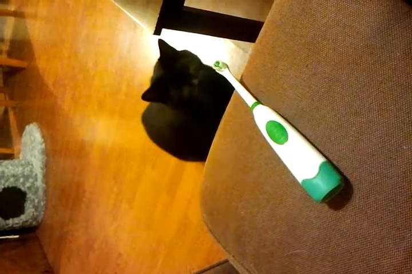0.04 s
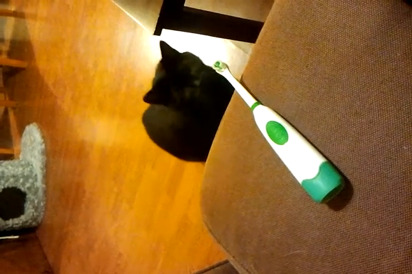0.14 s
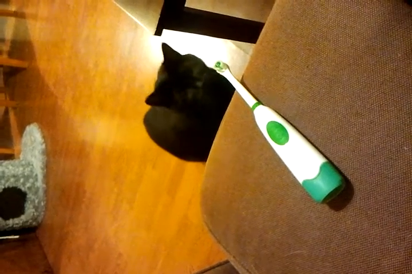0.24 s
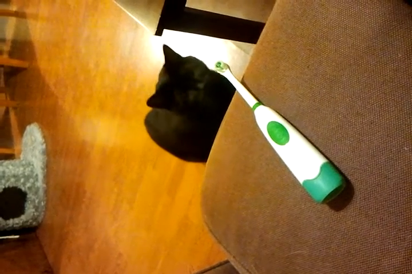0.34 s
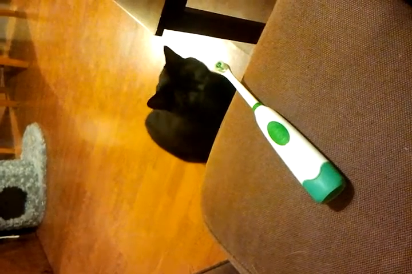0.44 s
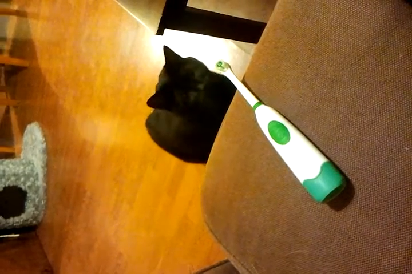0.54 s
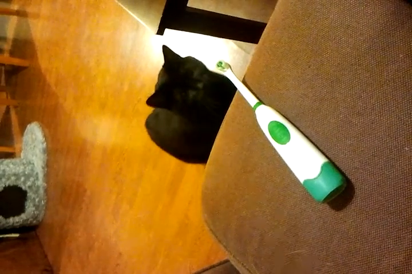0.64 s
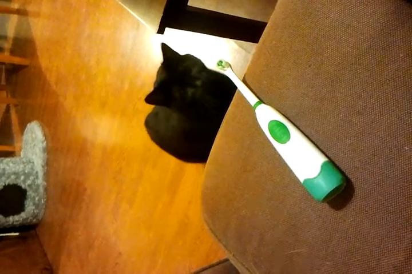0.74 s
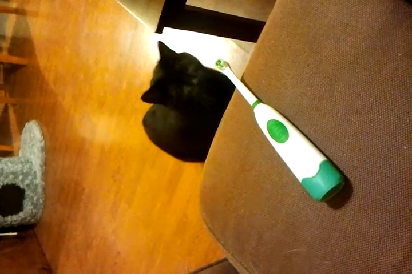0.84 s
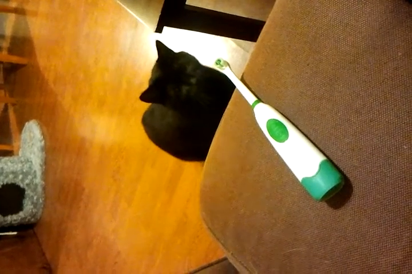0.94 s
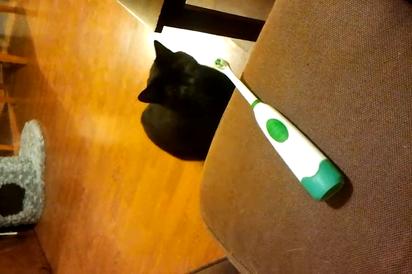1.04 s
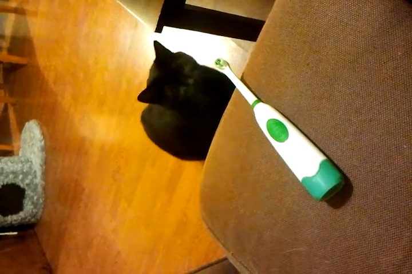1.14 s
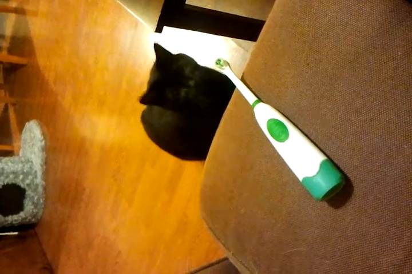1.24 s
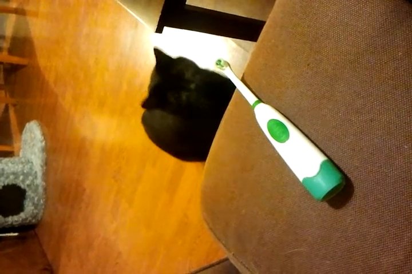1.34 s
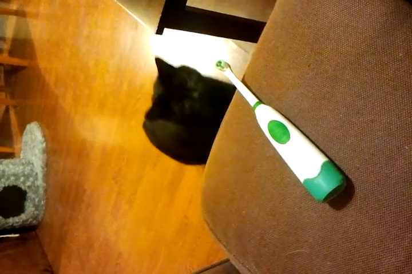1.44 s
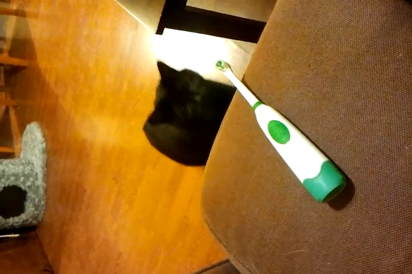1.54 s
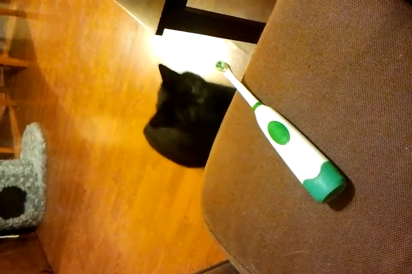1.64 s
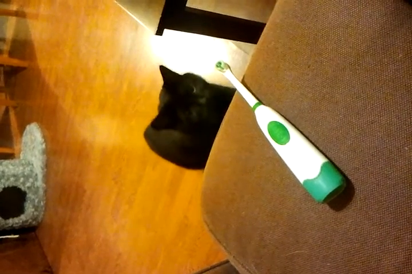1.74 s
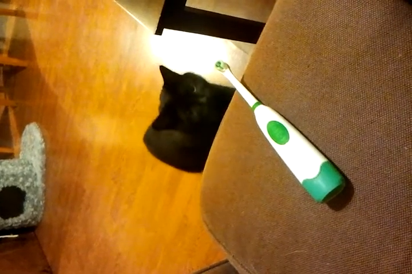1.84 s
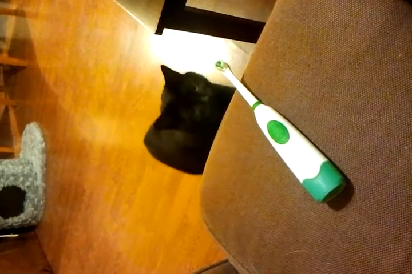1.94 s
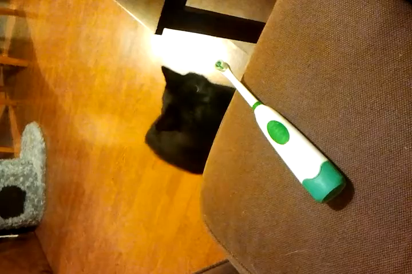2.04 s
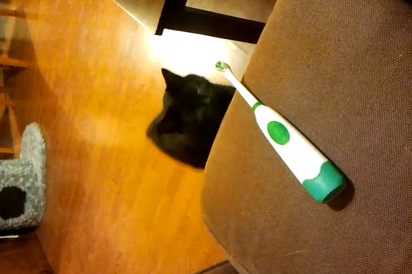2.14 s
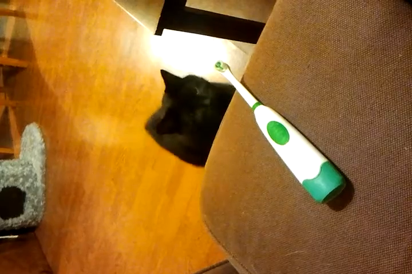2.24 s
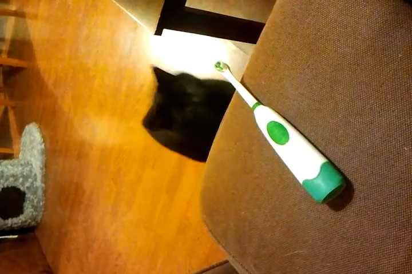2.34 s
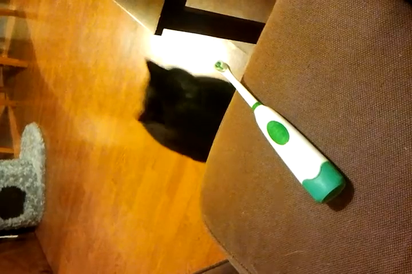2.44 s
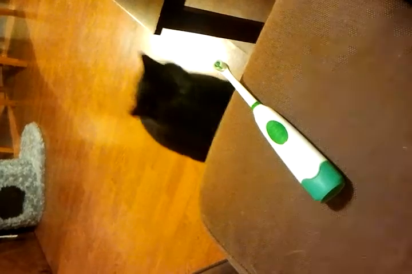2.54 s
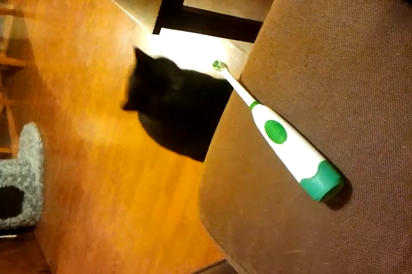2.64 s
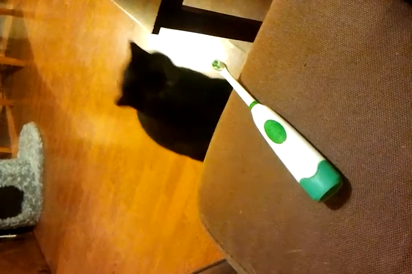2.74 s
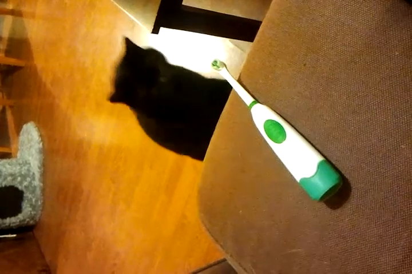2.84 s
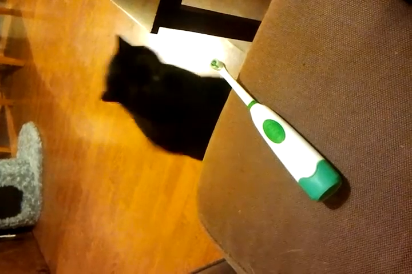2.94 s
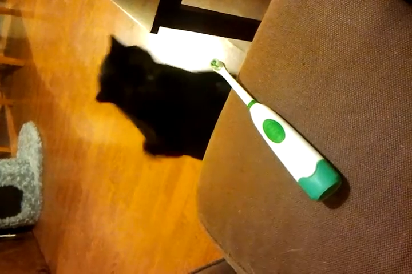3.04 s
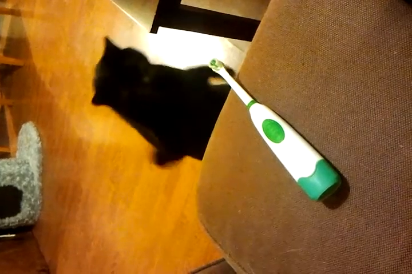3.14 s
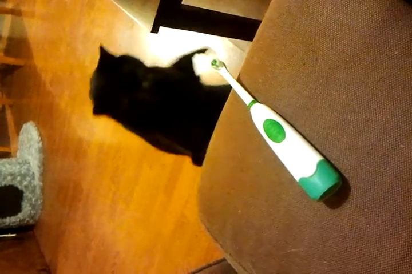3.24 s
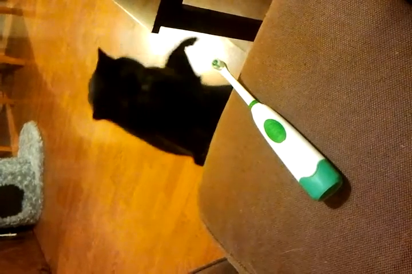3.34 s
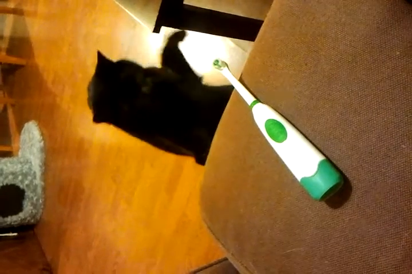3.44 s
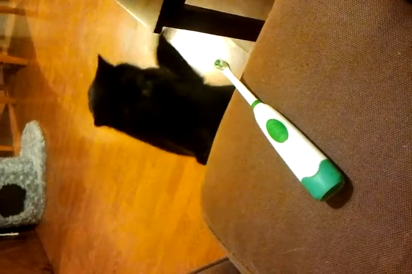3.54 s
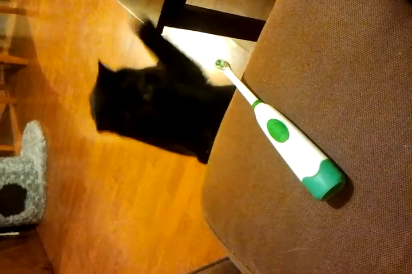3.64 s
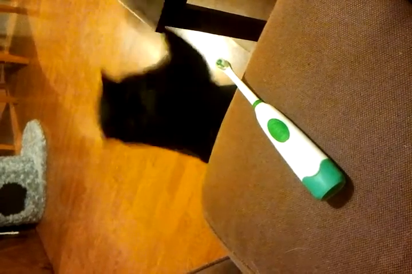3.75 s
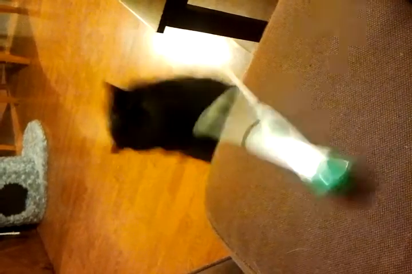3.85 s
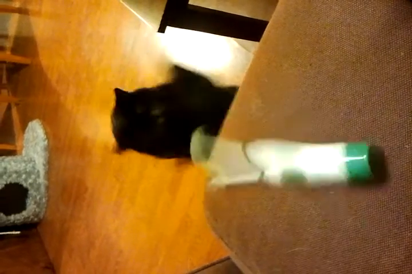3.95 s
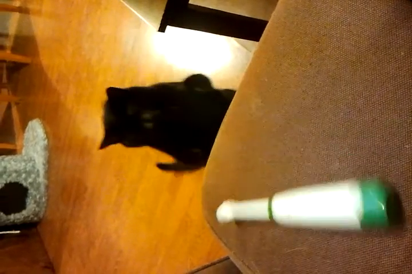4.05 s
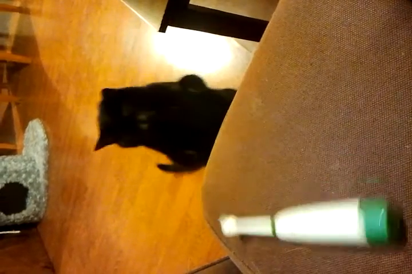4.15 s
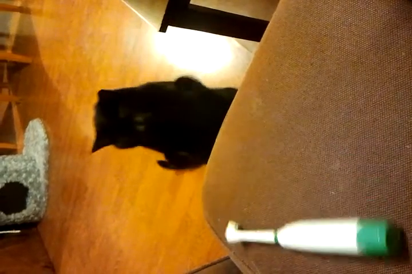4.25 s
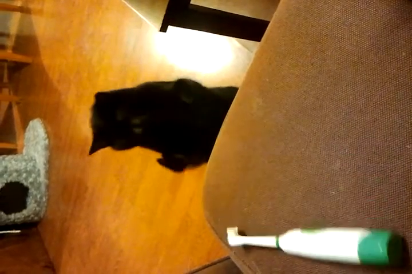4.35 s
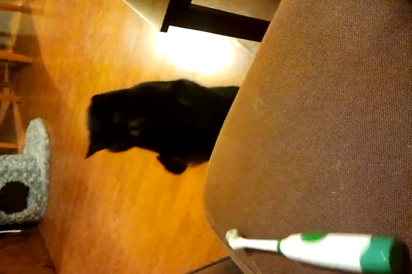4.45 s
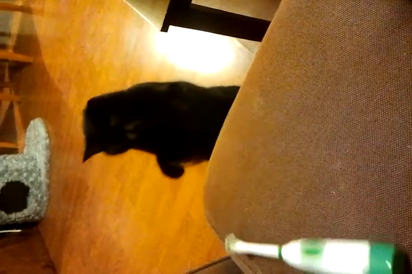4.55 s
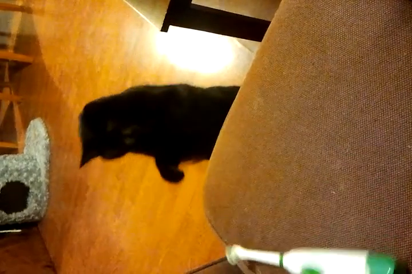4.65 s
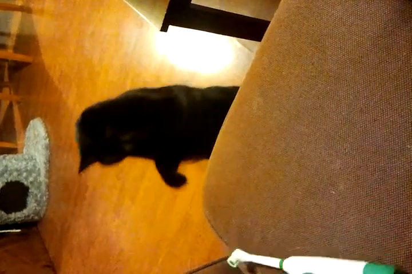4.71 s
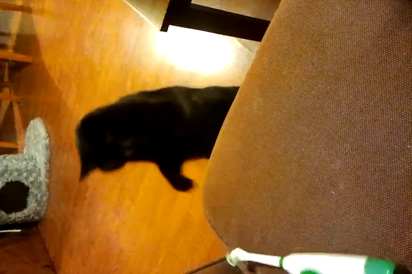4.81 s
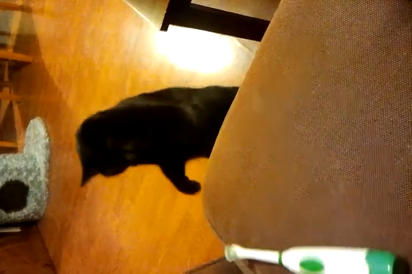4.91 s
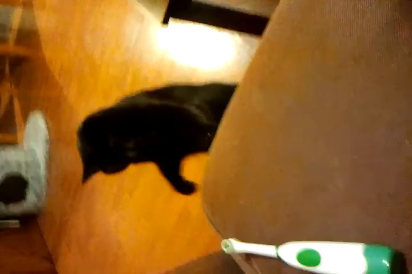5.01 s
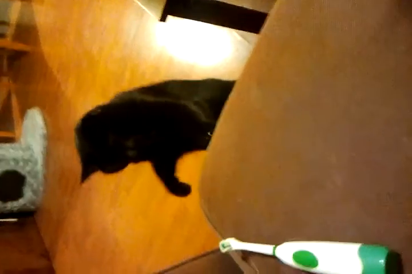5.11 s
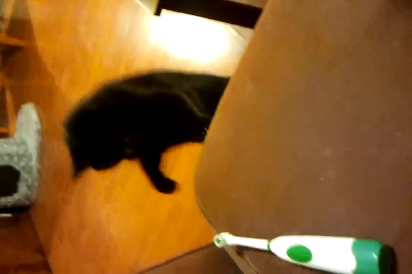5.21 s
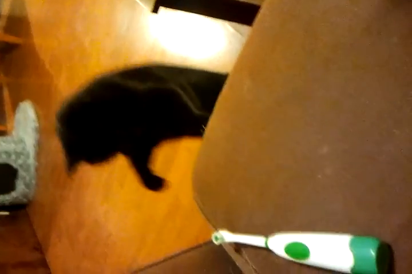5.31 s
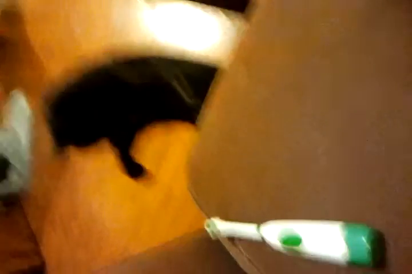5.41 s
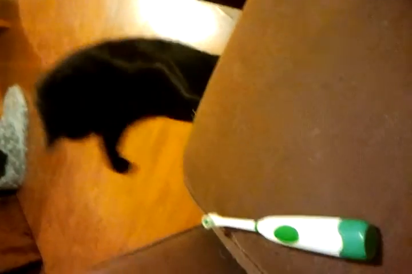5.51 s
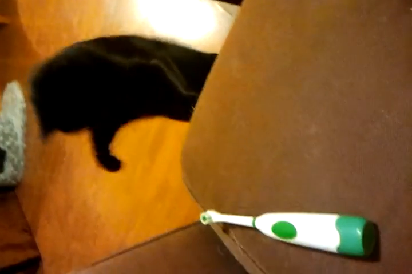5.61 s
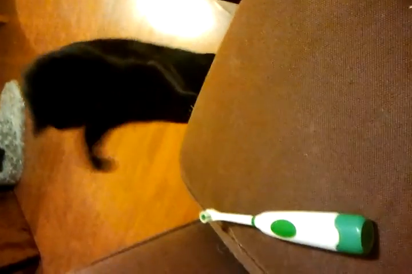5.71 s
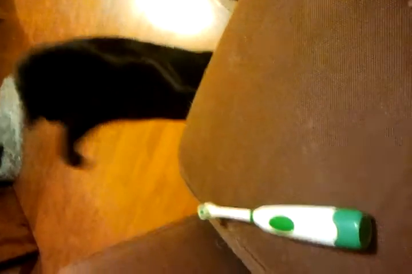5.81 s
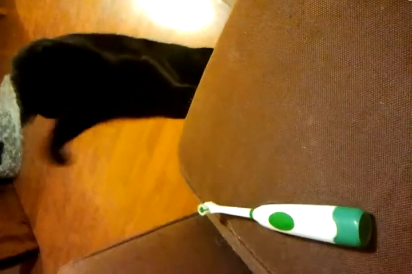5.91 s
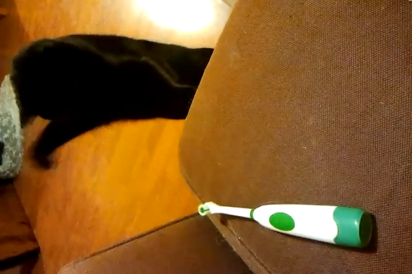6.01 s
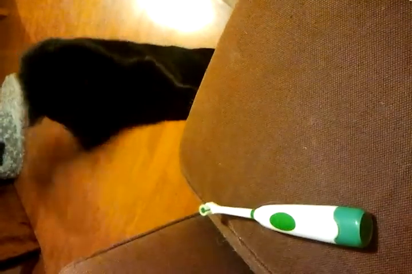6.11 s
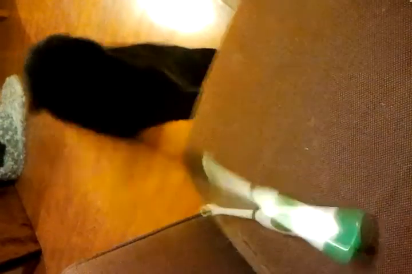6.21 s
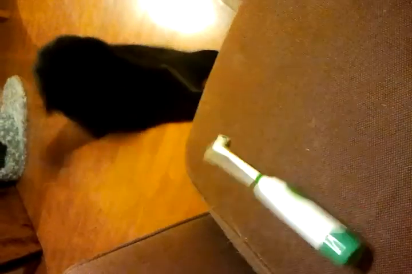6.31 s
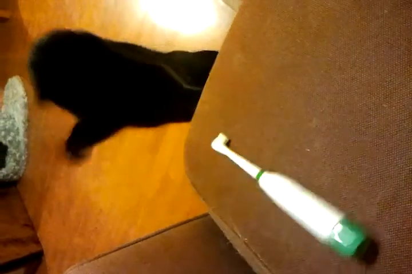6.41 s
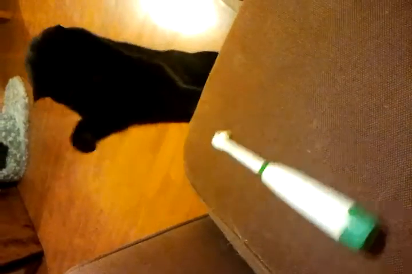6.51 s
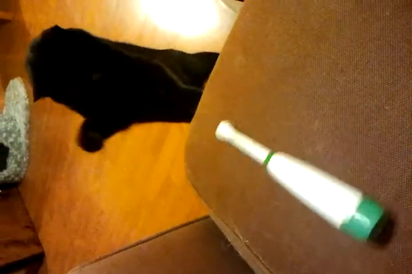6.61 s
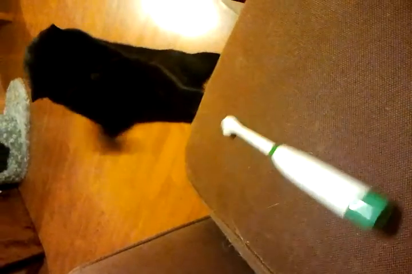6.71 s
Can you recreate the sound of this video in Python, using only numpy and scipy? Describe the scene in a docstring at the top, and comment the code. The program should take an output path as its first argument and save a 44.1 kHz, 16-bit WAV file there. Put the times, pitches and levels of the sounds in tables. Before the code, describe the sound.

A battery toothbrush lying on a padded fabric seat buzzes with a low, rough, nearly steady drone and plasticky ringing. Faint bumps come early, then a cat's paw hits it with sharp ticks and thuds. It rolls and rattles unevenly, settles into a brighter steady buzz, and is knocked loose again near the end. Close handheld microphone in a quiet small room, treble cut off.

```python
"""A battery toothbrush buzzes on a fabric seat; a cat paws it, it rolls, rattles loosely and settles.
A second paw blow near the end sets it loose again. Every stroke of the drive knocks the head several
times into the ringing plastic shell and shakes the cushion. Paw blows tick on the shell and thud in
the seat; a quiet room hiss, a low hum (with the seat's boom after the last blow near 143 Hz) and a
deep rumble lie below."""
import sys
import numpy as np
from scipy import signal
from scipy.fft import rfft, irfft
from scipy.io import wavfile
from scipy.ndimage import uniform_filter1d

SR = 44100
rng = np.random.default_rng(int(sys.argv[2]) if len(sys.argv) > 2 else 0)


def boost_factor(decibels):
    """Convert a level in decibels to a linear amplitude factor."""
    exponent = np.asarray(decibels, float) / 20
    return 10 ** exponent


def wav_record(signal):
    """Record a signal, one row per channel, as 16-bit PCM in the file named by sys.argv[1]."""
    frames = np.transpose(np.atleast_2d(signal))
    bounded = np.clip(frames, -1, 1)
    # unit amplitude maps onto the largest positive 16-bit level
    quanta = np.round(bounded * 32767).astype(np.int16)
    wavfile.write(sys.argv[1], SR, quanta)


N = 298557  # length in samples


def rms_one(x):
    """Scale to unit rms."""
    return x / np.sqrt(np.mean(x ** 2) + 1e-20)


def even(x, seconds):
    """Hold the running rms at 1, averaged over the given seconds."""
    return x / np.sqrt(uniform_filter1d(x ** 2, int(seconds * SR)) + 1e-20)


def in_time(rows):
    """Columns of a curve over time, one value a sample."""
    s, *columns = np.transpose(rows)
    return [np.interp(np.arange(N) / SR, s, column) for column in columns]


def drift(rate, count, at_s=np.arange(N) / SR):
    """Random curves of spread about 1, taking a new direction rate times a second."""
    knots = rng.standard_normal((count, 400))
    curves = np.array([np.interp(at_s * rate, np.arange(400), k) for k in knots])
    return curves * np.sqrt(3 / 2)  # joining the knots by lines had narrowed the spread


def clicks(at_s, sizes):
    """Band-limited clicks that may fall between samples."""
    at = np.ravel(at_s)[:, None] * SR
    index = np.floor(at).astype(int) + np.arange(-7, 9)
    taps = np.sinc(index - at) * np.cos(np.pi * (index - at) / 16) ** 2
    weights = taps * np.ravel(sizes)[:, None]
    return np.bincount(np.clip(index, 0, N).ravel(), weights.ravel(), N + 1)[:N]


def ring(x, hz, t60):
    """A resonance: a unit click starts a sine of height 1 that falls 60 dB in t60 seconds."""
    r = boost_factor(-60 / (t60 * SR))
    w = 2 * np.pi * hz / SR
    return signal.lfilter([0, np.sin(w)], [1, -2 * r * np.cos(w), r * r], x + 1e-18)


def swell(x, hz, rise_s):
    """A soft contact: the resonance applied twice swells to height 1 within rise_s, then dies."""
    t60 = np.log(1000) * rise_s
    return ring(ring(x, hz, t60), hz, t60) * 2 * np.e / (rise_s * SR)


def by_pose(up, over, loose, pose):
    """Blend of three values: brush face up, turned over, loose."""
    turned, looseness = np.clip(pose, 0, 1)
    return (1 - looseness) * ((1 - turned) * up + turned * over) + looseness * loose


def pose_level(levels_db, pose):
    """Level between the four ways of lying."""
    up, over, loose_up, loose_over = levels_db
    return by_pose(up, over, loose_up + pose[0] * (loose_over - loose_up), pose)


def no_mids(head):
    """The small head radiates no mids."""
    return signal.sosfilt(signal.butter(6, 5350, "high", fs=SR, output="sos"), head)


# how the brush lies: t/s, turned over (0-1), looseness (0-1)
LYING = [(0, 0, .13), (.7, 0, .08), (3.15, 0, .07), (3.74, 0, .13), (3.77, .5, 1), (4.08, 1, 1),
         (4.4, 1, .5), (4.56, 1, .9), (4.65, 1, .5), (4.75, 1, .7), (5.12, 1, .12), (5.4, 1, .06),
         (6.2, 1, .06), (6.22, .6, 1), (6.77, .6, .85)]
# creeping along the seat: t/s, share (0-1)
SEAT_CREEP = [(0, 0), (1.5, 0.2), (2.1, 0.86), (2.6, 0.89), (6.77, 0.8)]
# ringing modes of the shell and of the head: f/Hz, width/Hz,
# relative level/dB face up, the same turned over, the same loose
SHELL_MODES = [(1784, 406, -4, -7.5, -5.5), (2218, 260, -10, -6, -9), (2418, 600, -4, -8, 2),
               (2740, 690, -6, -12.5, 5), (3332, 230, -4.5, -8.5, 2), (3875, 420, -15, -4.5, -1),
               (4249, 180, -8, -2.5, -4.5), (4820, 690, -8, -9, -2.5)]
TIP_MODES = [(5430, 310, -13.5, -38, -25.5), (5940, 280, -7.5, 3.5, -31.5), (6226, 280, -9.5, -6.5, -6.5),
             (6750, 750, -5.5, 2.5, -1), (7670, 450, -22, -33, -1), (7550, 2100, -4, -1.5, 12),
             (8513, 520, 0, 4, 11), (8730, 2900, -4, 17, -23.5)]
# the head's rattle before its mids are cut: t/s, level/dB
HEAD_RATTLE = [(0, -55.5), (1.73, -54.5), (1.92, -56), (3.1, -57), (3.72, -54.5), (3.83, -59),
               (3.92, -49.5), (3.98, -53), (4.09, -51), (4.23, -51.5), (4.29, -45), (4.47, -40.5),
               (4.65, -48), (4.81, -42), (4.99, -42.5), (5.18, -49), (6.19, -47), (6.24, -55),
               (6.43, -56.5), (6.58, -50.5), (6.77, -52.5)]
# shell buzz, low overtones and cushion tone: level/dB face up, turned over, loose face up, loose turned over
SHELL_LEVELS = (-55.5, -58, -60, -54.5)
LOW_LEVELS = (-66.5, -68, -47.5, -67.5)
CUSHION_LEVELS = (-58.5, -64.5, -56.5, -83)
CREPT_BODY_DB = 1.5  # the shell buzz grows as the brush creeps along the seat
RATTLE_FLICKER_DB = 4  # when quite loose


def toothbrush():
    """Knocks in the shell, overtones, and the stroke's fundamental that the cushion radiates."""
    pose = np.clip(in_time(LYING), 0, 1)
    turned, looseness = pose
    crept, = in_time(SEAT_CREEP)
    body_db = pose_level(SHELL_LEVELS, pose) + CREPT_BODY_DB * crept * (1 - turned)
    low_db = pose_level(LOW_LEVELS, pose)
    cushion_db = pose_level(CUSHION_LEVELS, pose)
    flicker_db = RATTLE_FLICKER_DB * looseness ** 3 * drift(40, count=1)[0]
    head_db = in_time(HEAD_RATTLE)[0] + flicker_db

    turns = drive_turns(looseness)
    stroke_s = np.interp(np.arange(int(turns[-1])), turns, np.arange(N) / SR)
    strokes = stroke_s, np.gradient(stroke_s), pose
    knocks = shell_knocks(SHELL_MODES, 1, *strokes, slack=0.065, scatter_db=0.5, wander_db=4.5)
    head = shell_knocks(TIP_MODES, 2, *strokes, slack=0.03, scatter_db=4, wander_db=3)
    low, steady = overtones(turns, pose, crept)

    # power share of the shell buzz that differs from stroke to stroke
    uneven = np.clip(0.16 + 0.66 * looseness, 0, 1)
    body = np.sqrt(1 - uneven) * steady + np.sqrt(uneven) * knocks
    low = even(low + looseness ** 2 * handle_rustle(), 0.27)
    cushion = -np.sqrt(2) * np.sin(2 * np.pi * turns)
    buzz = boost_factor(body_db) * body + boost_factor(head_db) * no_mids(head)
    return buzz + boost_factor(low_db) * low + boost_factor(cushion_db) * cushion


# the drive sags slowly and wavers up and down when the brush rolls: t/s, mean stroke rate f/Hz
STROKE_RATE = [(0, 94.96), (.8, 94.95), (1.04, 94.8), (1.2, 95.0), (1.46, 94.77), (1.6, 95.05),
               (1.84, 95.08), (2.08, 94.62), (2.3, 94.7), (2.45, 94.36), (2.64, 94.74), (3.05, 94.66),
               (3.4, 94.33), (3.68, 94.52), (4.08, 95.78), (4.56, 94.0), (4.72, 95.87), (5.1, 94.8),
               (5.5, 94.75), (6.16, 94.37), (6.77, 94.4)]


def drive_turns(looseness):
    """Strokes counted up so far; the load varies when the brush rolls, and the speed with it."""
    rate_hz, = in_time(STROKE_RATE)
    wobble_hz = 1.9 * looseness ** 2 * drift(30, count=1)[0]
    return np.cumsum(rate_hz + wobble_hz) / SR


# knocks within one stroke: share of the stroke (0-1), shell and head level/dB face up,
# the same two turned over, the same two loose
KNOCKS = [(.0, 0, 0, 0, 0, 0, 0), (.09, -4, -3, -9, -7, -5, -6), (.28, -6, -12, -6, -2, -4, -12),
          (.45, -8, -3, -8, -11, -3, -14), (.62, -8, -9, -10, -13, -3, -6),
          (.8, -12, -15, -10, -14, -5, -16)]


def shell_knocks(modes, column, stroke_s, period_s, pose, slack, scatter_db, wander_db):
    """Each contact strikes each mode in its own slowly changing way; a loose brush knocks unevenly."""
    table = np.array(KNOCKS)
    share = table[:, :1]
    at_stroke = pose[:, (stroke_s * SR).astype(int)]
    looseness = np.clip(at_stroke[1], 0, 1)
    time_luck, size_luck = rng.standard_normal((2, len(table), len(stroke_s)))
    play = slack * (0.25 + share)  # the first knock keeps time best
    at_s = stroke_s + period_s * (share + play * looseness ** 1.33 * time_luck)
    lying_db = by_pose(*(table[:, column + k, None] for k in (0, 2, 4)), at_stroke)
    size_db = lying_db + scatter_db * looseness * size_luck
    out = 0
    for hz, width_hz, *pose_db in modes:
        own_db = wander_db * drift(0.58, count=len(table), at_s=stroke_s)
        # rolling turns each mode towards and away from the listener
        rocking_db = 2 * pose[1] * drift(12, count=1)[0]
        signs = rng.choice([-1, 1], (len(table), 1))
        hits = clicks(at_s, signs * boost_factor(size_db + own_db))
        rung = swell(hits, hz, 1 / (np.pi * width_hz))
        out = out + even(rung, 0.21) * boost_factor(by_pose(*pose_db, pose) + rocking_db)
    return even(out, 0.044)


# overtones of the stroke face up, face up after creeping, and turned over:
# multiple of the stroke rate, relative level/dB (row 1, the fundamental, is not played here)
OVERTONES_UP = [(1, 0), (2, -18.5), (3, -20), (4, -13), (5, -6.5), (6, -17.5), (7, -36), (8, -42),
                (9, -15.5), (10, -11), (11, -24.5), (12, -36), (13, -17.5), (14, -8.5), (15, -24.5),
                (16, -14.5), (17, -7.5), (18, -24), (19, -16), (20, -39), (21, -42), (22, -26.5),
                (23, -9.5), (24, -17), (25, -10), (26, -27), (27, -5), (28, -23.5), (29, -1.5), (30, -22.5),
                (31, -12), (32, -30.5), (33, -6), (34, -2.5), (35, -8), (36, -17.5), (37, -4.5), (38, -8.5),
                (39, -19.5), (40, -30), (41, -20), (42, -24.5), (43, -29.5), (44, -12.5), (45, -14),
                (46, -19)]
OVERTONES_CREPT = [(1, 0), (2, -26.5), (3, -24.5), (4, -9.5), (5, -14.5), (6, -14), (7, -37.5), (8, -35.5),
                   (9, -17), (10, -11.5), (11, -24.5), (12, -17.5), (13, -21), (14, -18.5), (15, -22.5),
                   (16, -18.5), (17, -13.5), (18, -17.5), (19, -25.5), (20, -23), (21, -26), (22, -23),
                   (23, -8.5), (24, -3), (25, -12), (26, -30), (27, -23), (28, -27.5), (29, -8.5),
                   (30, -15.5), (31, -10), (32, -9.5), (33, -7.5), (34, 2), (35, 2.5), (36, 5.5), (37, -5),
                   (38, -17.5), (39, -30.5), (40, -23.5), (41, -29), (42, -24), (43, -11), (44, -13),
                   (45, -26), (46, -28)]
OVERTONES_OVER = [(1, 0), (2, -9), (3, -9.5), (4, -4), (5, -8.5), (6, -19.5), (7, -28), (8, -36.5),
                  (9, -10), (10, -16), (11, -18), (12, -10.5), (13, -24), (14, -11), (15, -26), (16, -12),
                  (17, -33), (18, -26), (19, -9.5), (20, -6), (21, -14), (22, -9.5), (23, -10.5),
                  (24, -2.5), (25, -25.5), (26, -7), (27, -16.5), (28, 1.5), (29, -4), (30, -17.5),
                  (31, -6), (32, -4), (33, -5), (34, -8.5), (35, 1.5), (36, -12), (37, 1), (38, -14),
                  (39, 2), (40, -14.5), (41, -10), (42, -15), (43, -10.5), (44, -18.5), (45, -28),
                  (46, -7.5)]
FIRST_BODY_ORDER = 20  # from this multiple up, the overtone belongs to the shell buzz


def overtones(turns, pose, crept):
    """The part of the buzz locked to the stroke: overtones bunched behind the main knock."""
    turned, looseness = pose
    coarse_s = np.arange(0, N, 64) / SR
    sway = drift(1.949, count=len(OVERTONES_UP), at_s=coarse_s).repeat(64, axis=1)[:, :N]
    low = body = 0
    rows = list(zip(OVERTONES_UP, OVERTONES_CREPT, OVERTONES_OVER, sway))
    for (k, up_db), (_, crept_db), (_, over_db), own in rows[1:]:
        level_db = up_db + crept * (crept_db - up_db)
        level_db = level_db + turned * (over_db - level_db)
        level_db = level_db + (2.1 + 3 * looseness) * own
        level_db = level_db - 0.5 * k * looseness ** 2  # duller when loose
        # nearly in step: one ringing burst a stroke
        lag = 2 * np.pi * (0.09 * k + 0.002 * (k - 35) ** 2)
        phase = 0.4 * rng.standard_normal() - lag
        tone = boost_factor(level_db) * np.cos(2 * np.pi * turns * k + phase)
        if k < FIRST_BODY_ORDER:
            low = low + tone
        else:
            body = body + tone
    return even(low, 0.21), even(body, 0.11)


def handle_rustle():
    """The handle drags over the weave: noise from 200 to 1900 Hz."""
    band = signal.butter(1, [200, 1900], "band", fs=SR, output="sos")
    return rms_one(signal.sosfilt(band, rng.standard_normal(N)))


# paw ticks on the shell: t/s, strength level/dB, shell against head level/dB
PAW_TICKS = [(3.5425, -58.5, 14.5), (3.762, -25.5, -6.5), (3.7805, -39.5, 1.5), (3.788, -30, -10),
             (3.7952, -45.5, 4.5), (6.2116, -20.5, -15.5), (6.2199, -25.5, -5), (6.2243, -31, -5.5),
             (6.228, -54, -6), (3.888, -60.5, 12.5), (6.2658, -39, -1.5)]


def ticks():
    """A claw strikes all shell and head modes at once."""
    s, strength_db, body_db = np.transpose(PAW_TICKS)
    parts = []
    for modes, share_db in ((SHELL_MODES, body_db), (TIP_MODES, 0)):
        out = 0
        for hz, width_hz, _, _, loose_db in modes:
            luck_db = 2 * rng.standard_normal(len(s))
            blow_db = strength_db + share_db + loose_db - 7 + luck_db
            out = out + swell(clicks(s, boost_factor(blow_db)), hz, 1 / (np.pi * width_hz))
        parts.append(out)
    body, head = parts
    return body + no_mids(head)


# thuds in seat and floor: t/s, push level/dB, push f/Hz,
# wooden clack and boom level/dB relative to the push
SEAT_THUDS = [(2.4055, -37.5, 400, -3, -42), (2.461, -53, 298, 3, -21), (2.4722, -51.5, 238, 4.5, -29),
              (3.545, -43, 540, -1.5, -40), (3.7617, -45, 305, 2.5, -6.5), (3.7841, -36.5, 298, -5, -17.5),
              (3.7967, -54, 197, -37, -23), (3.888, -25, 453, -11, -26), (6.2141, -28, 295, -47, -7.5),
              (6.2183, -26.5, 370, -28, -30), (6.2272, -31.5, 195, -15, -33)]
# seat modes: f/Hz, relative level/dB, t60/s
CUSHION_MODES = [(31.2, -12, 0.18), (98, 6.5, 0.083), (112, -15, 0.36), (180.5, -4, 0.29),
                 (270, -9.5, 0.13), (365, -9.5, 0.26), (517, 9, 0.037), (597, -10, 0.066)]
PUSH_RISE_CYCLES = 0.62
CLACK_HZ, CLACK_RISE_S = 914, 0.00082


def thuds():
    """A short soft push with a wooden clack, then the seat booms in its modes."""
    s, push_db, push_hz, clack_db, boom_db = np.transpose(SEAT_THUDS)
    out = 0
    for at_s, level_db, hz in zip(s, push_db, push_hz):
        out = out + swell(clicks([at_s], [-boost_factor(level_db)]), hz, PUSH_RISE_CYCLES / hz)
    out = out + swell(clicks(s, -boost_factor(push_db + clack_db)), CLACK_HZ, CLACK_RISE_S)
    booms = 0
    for hz, mode_db, t60 in CUSHION_MODES:
        luck_db = rng.standard_normal(len(s))
        hits = clicks(s + 0.0028, boost_factor(push_db + boom_db + mode_db + luck_db))
        booms = booms + ring(hits, hz, t60)
    return out + signal.sosfilt(signal.butter(2, 800, fs=SR, output="sos"), booms)


ROOM_T60_S, ROOM_DB = 0.39, -13


def room(x):
    """The room's answer: a tail of dulled noise that dies away."""
    t = np.arange(int(0.5 * SR)) / SR
    tail = rng.standard_normal(len(t)) * boost_factor(-60 * t / ROOM_T60_S) * (t > 0.004)
    tail = signal.lfilter([1], [1, -0.6], tail)
    return boost_factor(ROOM_DB) * signal.fftconvolve(x, tail / np.sqrt(np.sum(tail ** 2)))[:N]


# colour of the room hiss: f/Hz, relative level/dB per Hz
HISS_COLOUR = [(50, -13.5), (100, -12), (250, -18.5), (500, -22), (1000, -26), (1900, -25.5), (3000, -17),
               (5000, -27.5), (7000, -13.5), (8300, -20.5), (9150, -33)]
HISS_DB = -62


def room_hiss():
    """Steady noise shaped in frequency by the colour curve."""
    f = np.fft.rfftfreq(N, 1 / SR) + 1
    hz, level_db = np.transpose(HISS_COLOUR)
    colour = boost_factor(np.interp(np.log(f), np.log(hz), level_db, left=-60, right=-90))
    return boost_factor(HISS_DB) * rms_one(irfft(rfft(rng.standard_normal(N)) * colour, N))


# low hum, with the seat's boom after the last blow near 143 Hz: t/s, f/Hz, level/dB
HUM_AND_BOOM = [(0, 130, -62), (.32, 127, -70.5), (.51, 128, -80), (.6, 131, -66.5), (2.06, 131.5, -71),
                (2.24, 131, -89), (2.5, 138, -94), (3.0, 135, -77), (4.15, 132, -78), (4.62, 130, -70.5),
                (5.05, 130, -97), (5.2, 133, -76), (5.9, 126, -76), (6.15, 130, -69), (6.33, 143.7, -73.5),
                (6.49, 140.3, -62), (6.77, 140, -80)]


def low_hum():
    """One sine follows the pitch and level of the hum, then of the seat's boom after the last blow."""
    hz, level_db = in_time(HUM_AND_BOOM)
    return np.sqrt(2) * boost_factor(level_db) * np.sin(2 * np.pi * np.cumsum(hz) / SR)


# jolts that swell the rumble: t/s, peak level/dB
RUMBLE_JOLTS = [(.07, -72), (.98, -68), (1.55, -66), (3.18, -81), (3.79, -54.5), (4.41, -72), (6.28, -52)]
JOLT_RISE_DB_PER_S, JOLT_FALL_DB_PER_S, RUMBLE_DB = 155, 45, -80.5


def deep_rumble():
    """Deep noise through the hand: each jolt rises fast and dies slowly over a restless floor."""
    band = signal.butter(2, [26, 38], "band", fs=SR, output="sos")
    deep = even(signal.sosfilt(band, rng.standard_normal(N)), 0.4)
    t = np.arange(N) / SR
    level_db = RUMBLE_DB + 3 * drift(14, count=1)[0]
    for s, peak_db in RUMBLE_JOLTS:
        drop_db = np.maximum(JOLT_RISE_DB_PER_S * (s - t), JOLT_FALL_DB_PER_S * (t - s))
        level_db = np.maximum(level_db, peak_db - drop_db)
    return boost_factor(level_db) * deep


def scene():
    """Brush, blows with their room tail, background."""
    blows = ticks() + thuds()
    brush = toothbrush()
    tail = room(blows)
    background = room_hiss() + low_hum() + deep_rumble()
    return (brush + blows + tail + background)[None]


def roll_off(x):
    """The treble ends steeply here."""
    return signal.sosfilt(signal.butter(12, 9280, fs=SR, output="sos"), x)


def record(dry):
    """A small recorder with a steep top cut, 60 dB down from 9300 Hz."""
    cut = signal.sosfilt(signal.cheby2(10, 60, 9300, fs=SR, output="sos"), dry)
    return roll_off(cut)


dry = scene()
out = record(dry)
wav_record(out)
```